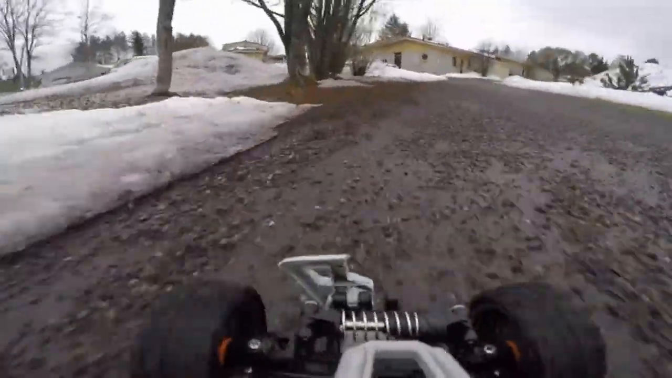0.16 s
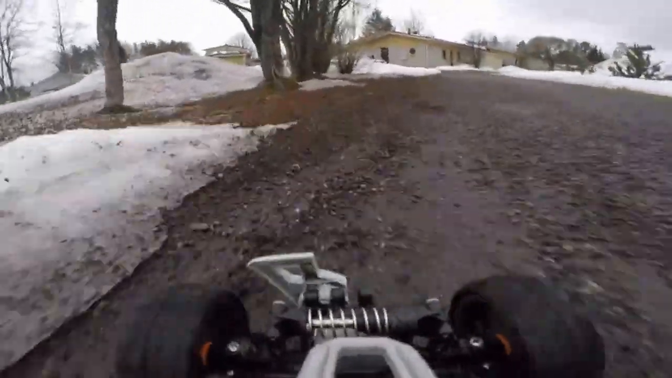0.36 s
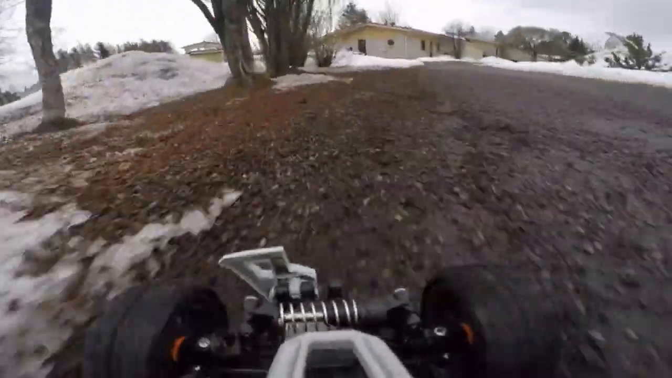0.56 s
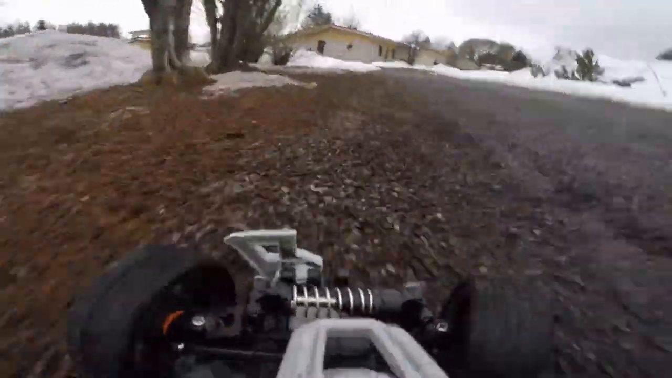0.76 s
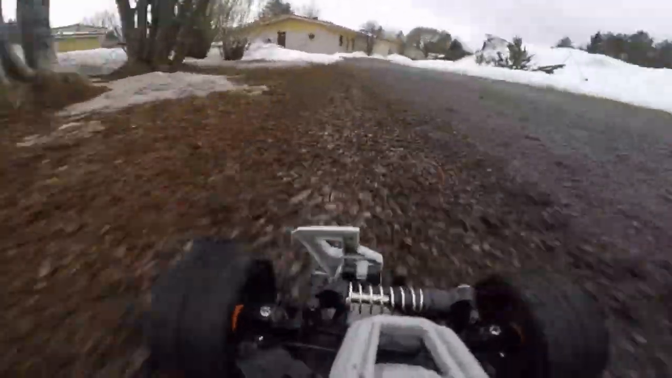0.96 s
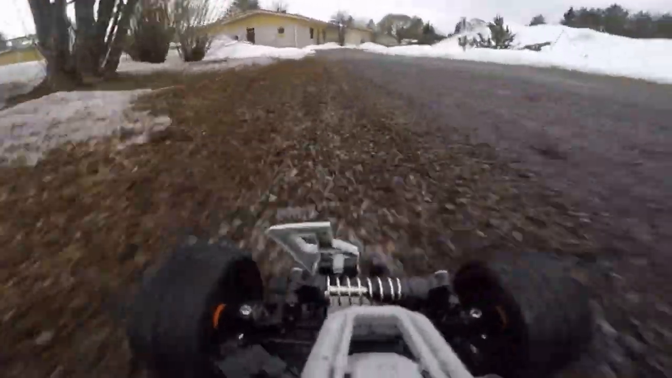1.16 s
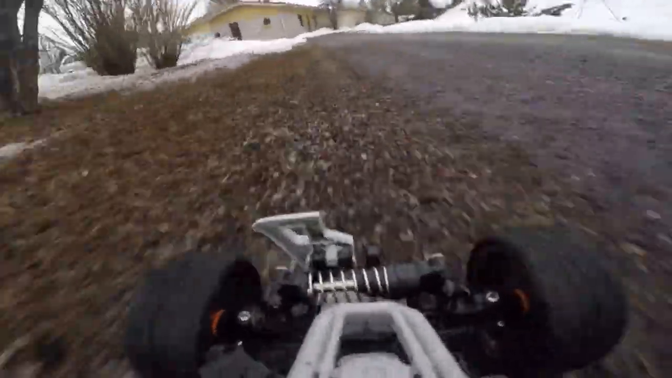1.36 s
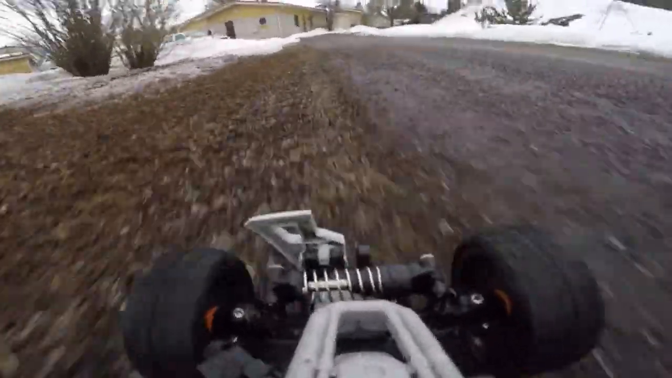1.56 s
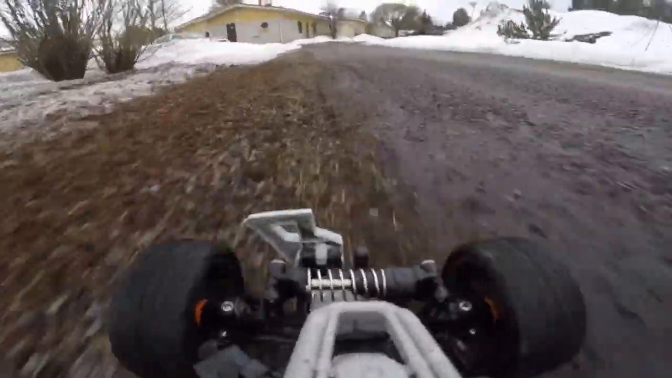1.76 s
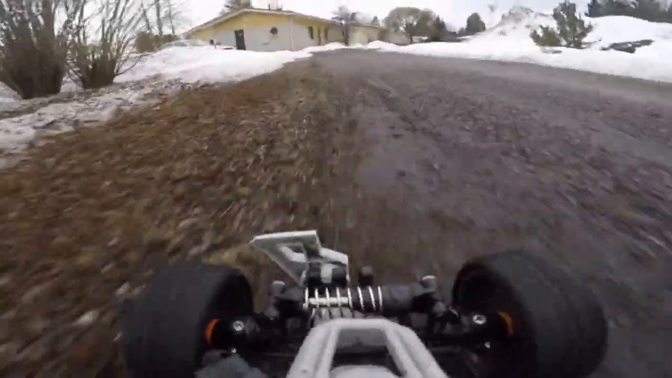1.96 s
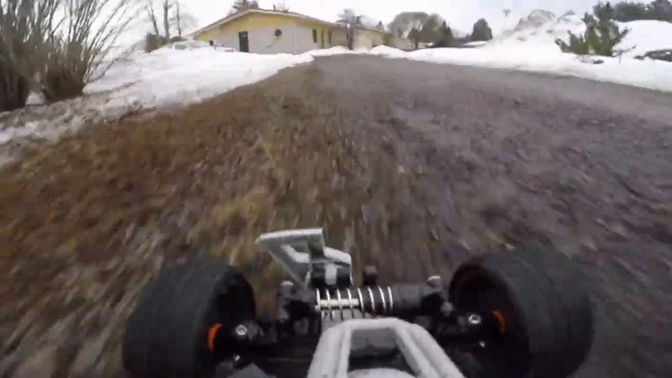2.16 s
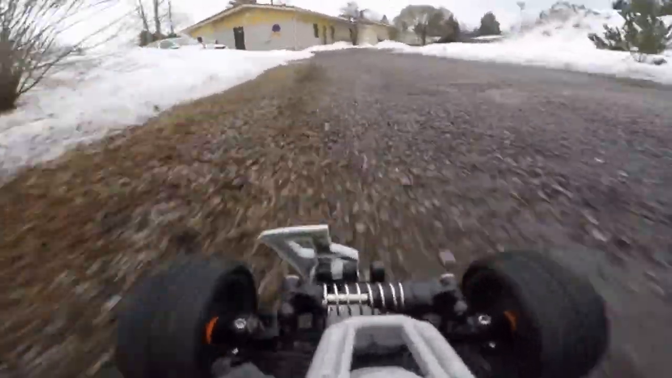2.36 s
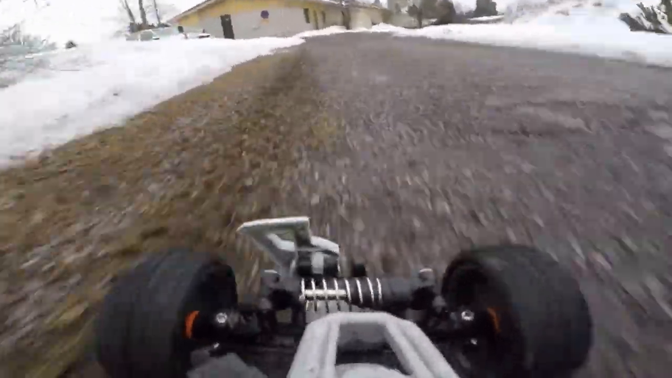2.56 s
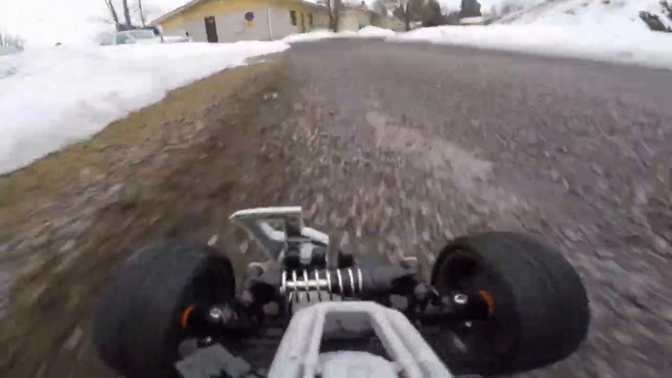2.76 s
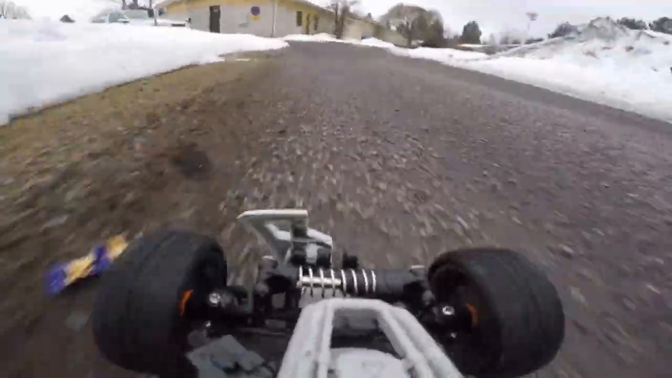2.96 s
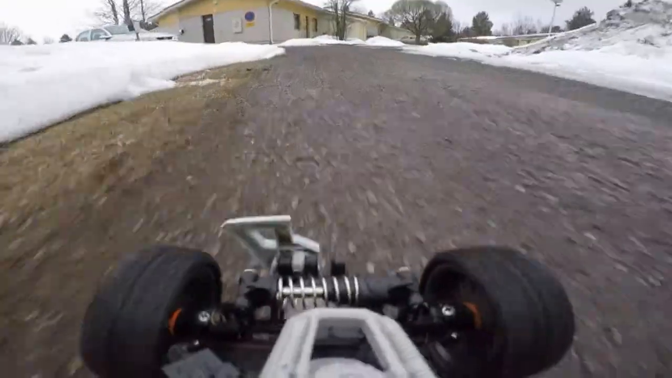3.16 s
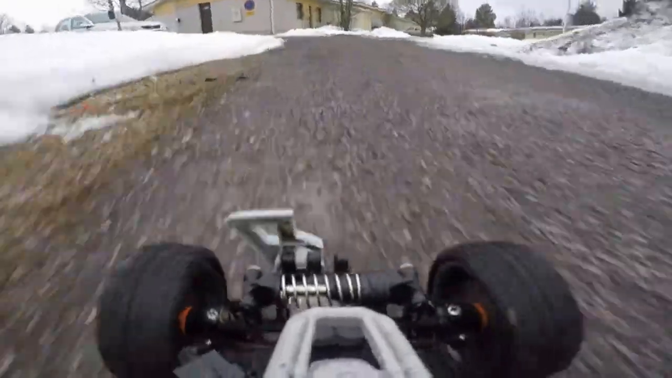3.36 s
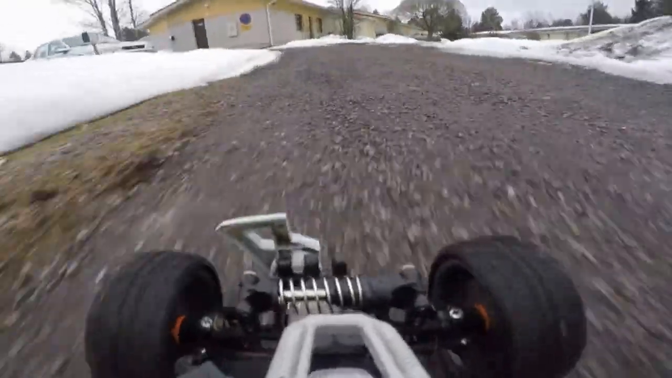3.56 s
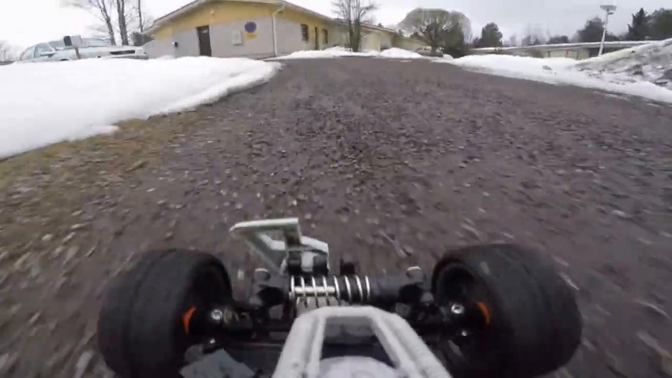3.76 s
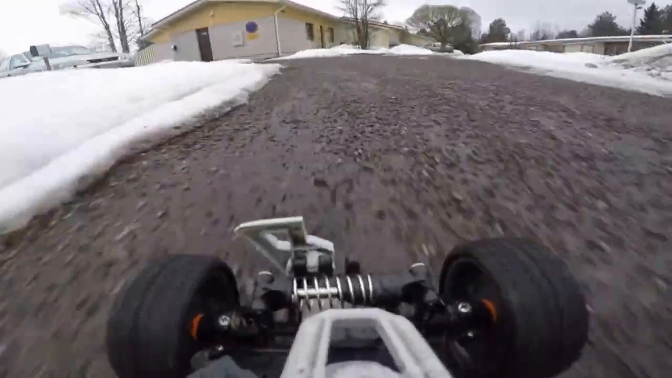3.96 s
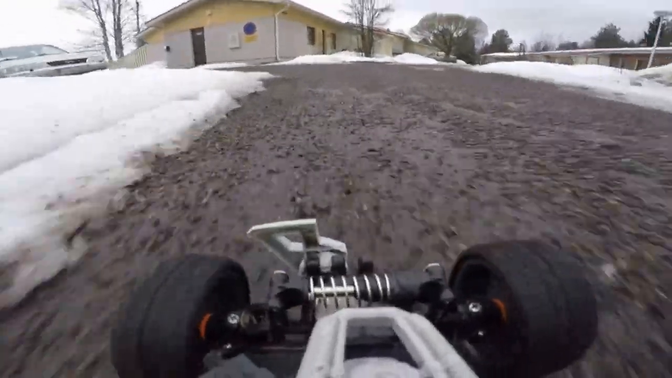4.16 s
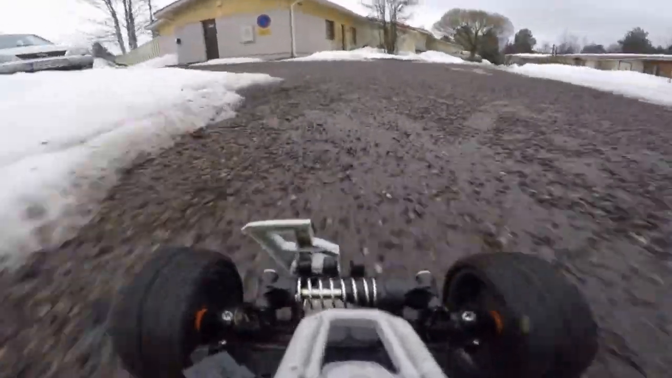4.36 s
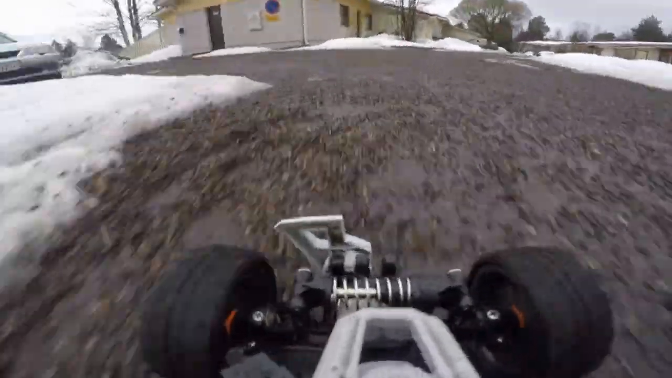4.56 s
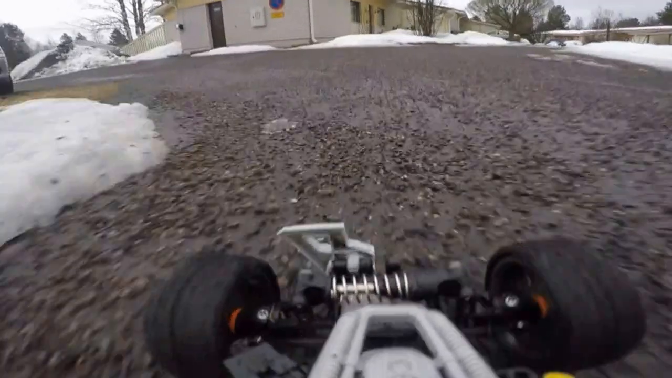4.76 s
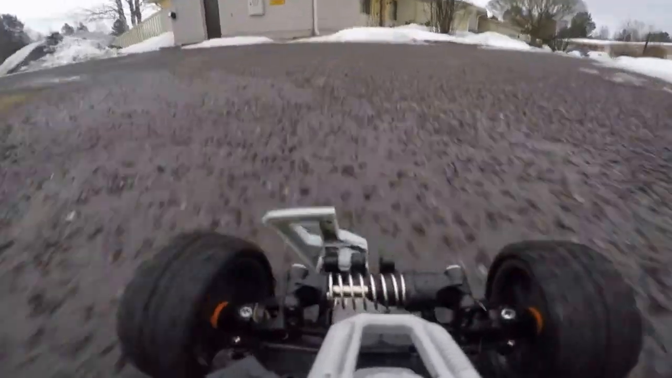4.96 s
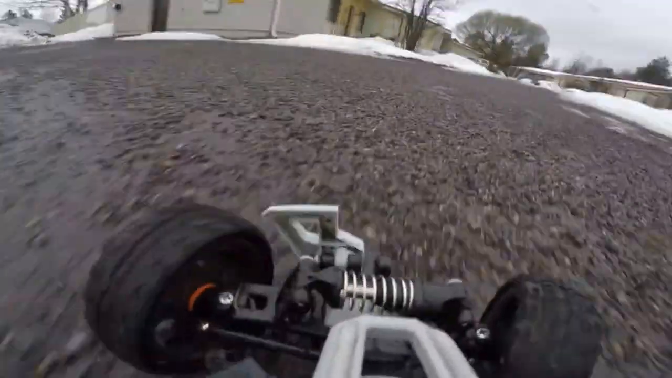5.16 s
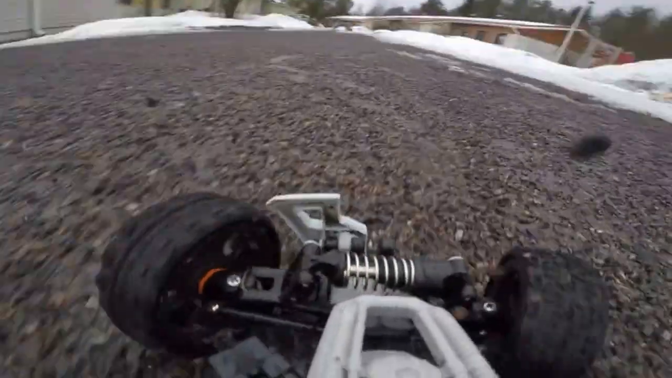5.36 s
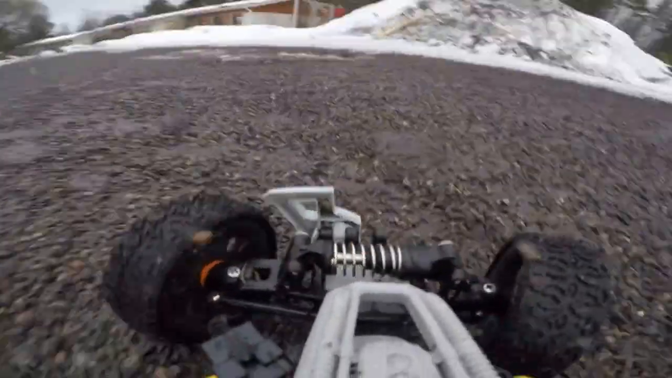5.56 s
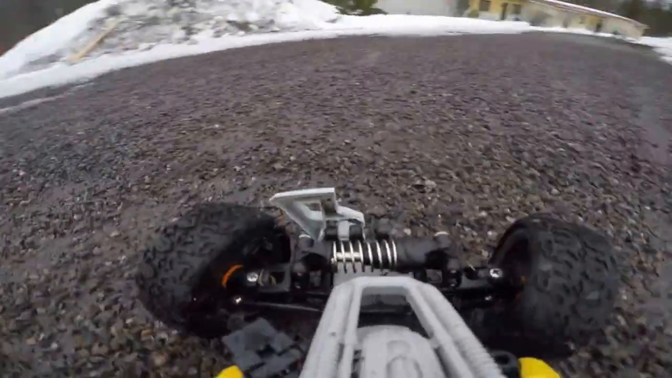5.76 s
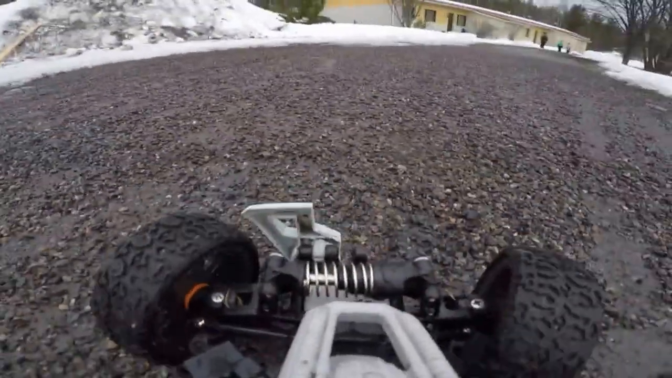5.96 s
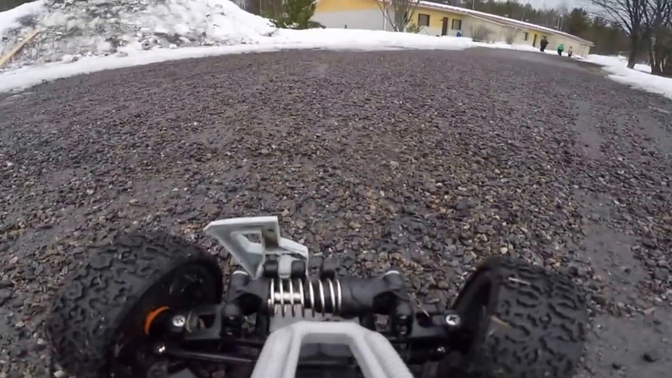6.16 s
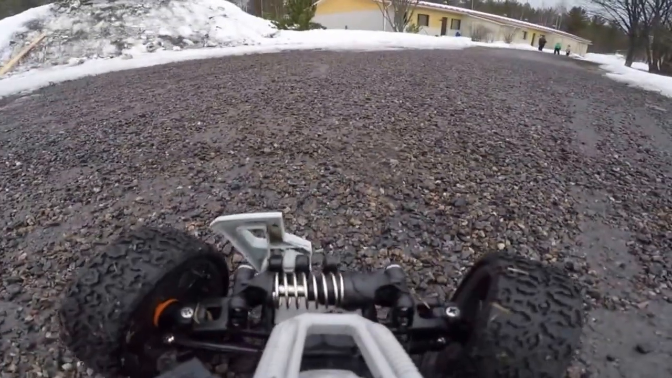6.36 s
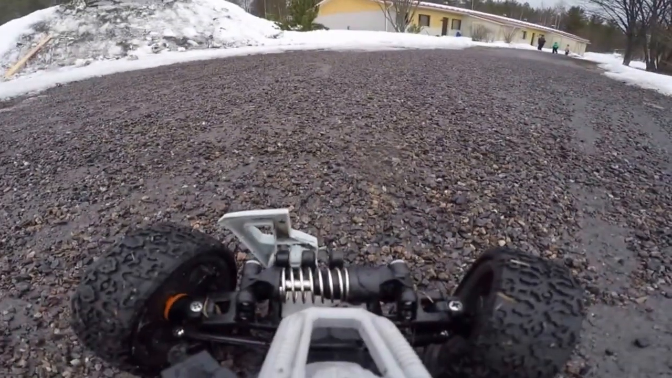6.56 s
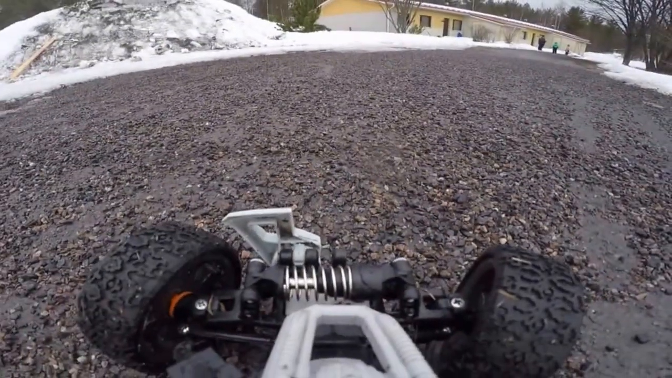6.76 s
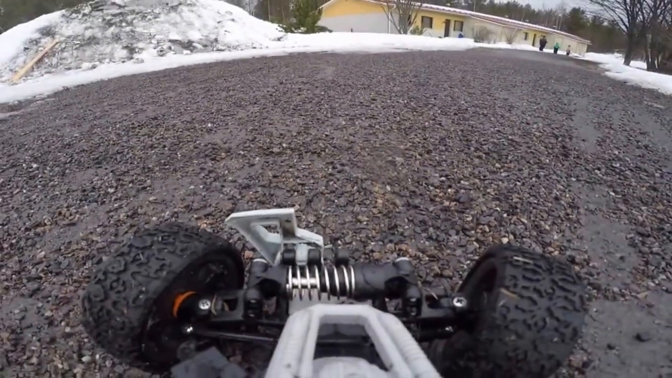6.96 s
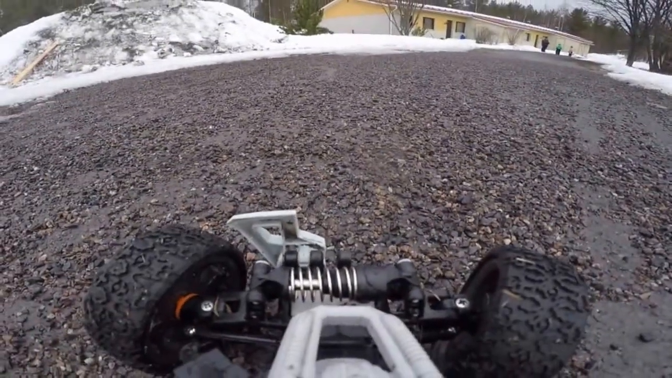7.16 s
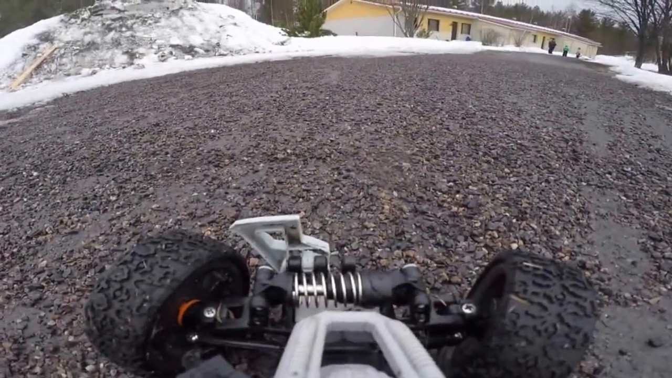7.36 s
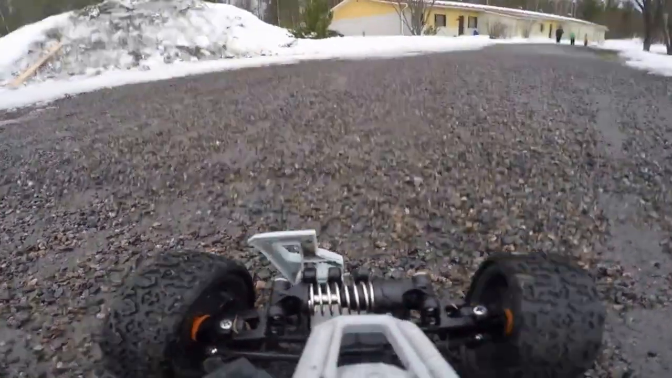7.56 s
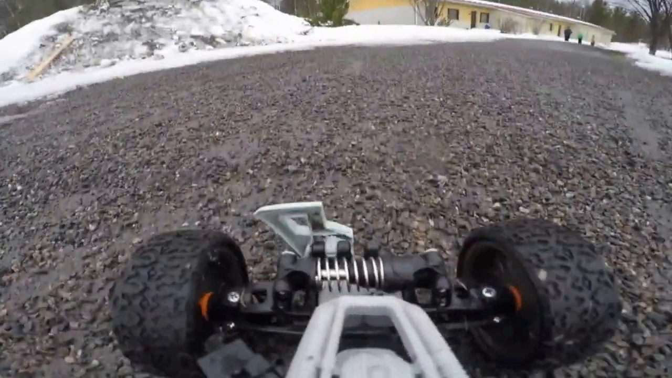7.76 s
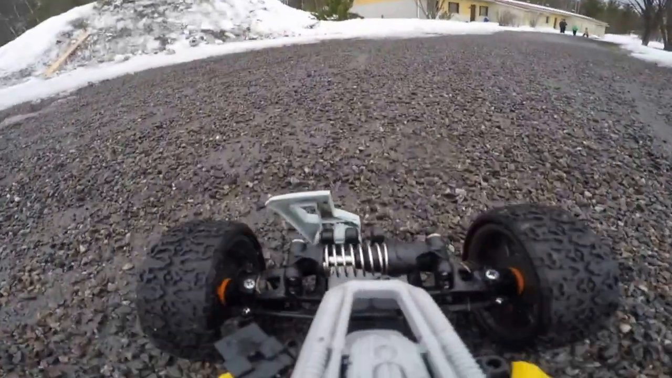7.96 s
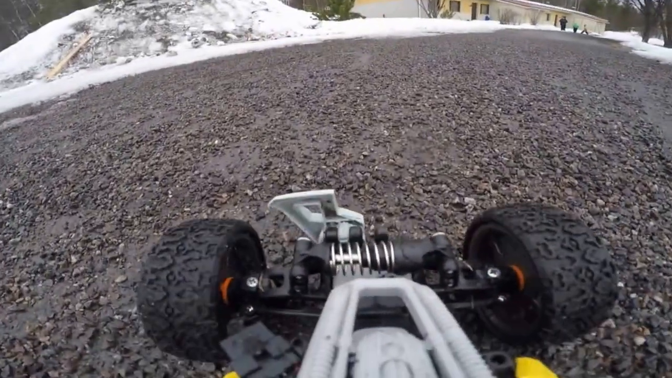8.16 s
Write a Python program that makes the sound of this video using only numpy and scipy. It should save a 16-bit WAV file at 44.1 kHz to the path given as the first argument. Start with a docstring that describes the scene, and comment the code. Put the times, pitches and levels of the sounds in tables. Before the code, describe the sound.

Close, boxy and dry, from a cased microphone mounted on a toy car: irregular plastic clatter, suspension bumps, dull gravel crunch and some rushing spray. The rattling grows denser and harder, then dies as the car stops on gravel outdoors. Faint hiss rises with a thin whine until a distorted bang starts a short lurch, a few knocks and near silence again.

```python
"""Gravelly tarmac: a radio-controlled car carries a cased camera, stops, waits and jerks forward again.
The microphone is in the case, so almost everything arrives through the chassis: damped swings for bumps,
noise bursts ringing mount and case for knocking parts, showers of tiny grains for crunching grit.
A few stones tick on the case, faint hiss and a thin whine fill the wait; the hardest jolts overload."""
import sys
import numpy as np
from scipy import signal
from scipy.fft import rfft, irfft
from scipy.io import wavfile

SR = 44100
rng = np.random.default_rng(int(sys.argv[2]) if len(sys.argv) > 2 else 0)


def file_out(sig):
    """Save sig as 16-bit WAV at sys.argv[1]."""
    # one column per channel
    cols = np.atleast_2d(sig).T
    # limit, then scale
    lim = np.clip(cols, -1, 1)
    pcm = np.round(lim * 32767).astype(np.int16)
    wavfile.write(sys.argv[1], SR, pcm)


N = 362502
TIME = np.arange(N) / SR  # s

# The distinct jolts, hard and soft, each a wheel hitting a bump and a loose part knocking.
# Each row: time in seconds, knock in dB, relative brightness in dB, pitch of the part in Hz,
# time scale of the chatter in seconds, suspension thud in dB before the common bump gain.
DISTINCT_JOLTS = [(.115, -19, 6.5, 1240, 0.0053, -8), (0.329, -29.5, 13, 910, 0.0052, -16),
                  (0.424, -16, 11, 1600, 0.0045, -27), (0.44, -20, 4, 1200, .006, -24),
                  (0.517, -18, -1, 1070, 0.011, -5), (.577, -20.5, -10, 2630, 0.0015, -14),
                  (0.65, -27, -21, 600, 0.0022, -12), (.746, -22.5, -5, 600, 0.0014, -8.5),
                  (.9, -17.5, -8.5, 3570, 0.0023, -17), (0.933, -17, 8, 580, 0.0032, -8.5),
                  (1.018, -23.5, -10, 596, 0.0035, -16.5), (1.059, -24.5, 17, 3570, 0.0016, -20),
                  (1.15, -23, -32, 580, 0.0034, -9), (1.2492, -18, 5.5, 1160, 0.0024, -10),
                  (1.379, -20, 5, 576, 0.0046, -7), (1.415, -16, -3.5, 1310, 0.00087, -18),
                  (1.468, -17, -15, 2450, 0.0027, -7.5), (1.583, -18.5, 4, 1400, 0.0033, -17),
                  (1.597, -18, -10, 1790, 0.0021, -14), (1.637, -15.5, -7, 600, 0.0019, -6),
                  (1.68, -14, 3, 1180, .002, -50), (1.725, -22, 10, 1300, 0.0029, -20),
                  (1.758, -18.5, 0, 560, 0.0066, -10), (1.821, -17.5, -5, 595, 0.008, -15),
                  (1.851, -16.5, 13, 805, 0.0029, -13.5), (1.9, -17, 6, 570, 0.0048, -12),
                  (1.967, -12.5, -5.5, 580, 0.0011, -27), (2, -20, 13, 2780, .0034, -12.5),
                  (2.084, -13.5, 2.5, 580, 0.013, -15.5), (2.098, -11.5, 2.5, 870, 0.003, -7),
                  (2.154, -16, -8, 3780, .002, -4.5), (2.173, -15.5, 6, 612, 0.0065, -14),
                  (2.184, -18.5, 22, 1076, 0.0065, -28), (2.221, -16, -6, 4100, 0.0015, -11),
                  (2.289, -16.5, -24, 720, .007, -18), (2.3196, -19, 3, 1800, 0.004, -20),
                  (2.357, -20.5, -16, 1290, 0.0023, -35), (2.375, -21.5, -9, 1880, 0.0041, -33),
                  (2.446, -19, 6, 3740, 0.0025, -30), (2.468, -19.5, 1, 4060, 0.0025, -9),
                  (2.521, -26, 6, 604, 0.0061, -14), (2.591, -19, 1, 3300, .003, -22),
                  (2.603, -17.5, 8, 1920, 0.0026, -16.5), (2.688, -14, -5.5, 1520, 0.0014, -9.5),
                  (2.699, -18, 20.5, 640, 0.0042, -19.5), (2.7612, -13, -9, 580, 0.0037, -27),
                  (2.784, -14.5, 11.5, 840, 0.0034, -2), (2.818, -15.5, -7, 3180, 0.0016, -34),
                  (2.855, -19, 2, 1673, 0.012, -13), (2.8855, -11, 8, 1050, 0.0027, -7),
                  (2.907, -25, 19, 1932, 0.0023, -18), (2.976, -17.5, -8, 1320, 0.0054, -13),
                  (3.02, -17, 6, 2970, 0.0021, -13), (3.049, -21.5, 2, 1150, 0.0012, -30),
                  (3.078, -21.5, -6, 3780, 0.009, -36), (3.096, -11, -4.5, 1420, 0.0044, -9),
                  (3.1241, -15.5, 3, 1200, 0.00097, -18), (3.174, -23, -7, 3380, 0.0039, -12),
                  (3.2454, -8, 1.5, 1160, 0.0029, -5), (3.2825, -13.5, 5.5, 820, 0.0078, -12.5),
                  (3.359, -15.5, 3.5, 1400, 0.003, -24), (3.462, -19.5, 9, 960, 0.0031, -38),
                  (3.616, -24.5, 11.5, 1160, 0.0012, -33), (3.651, -24, -32, 600, 0.0027, -12.5),
                  (3.688, -18.5, -5, 3260, 0.0035, -7), (3.75, -22.5, 5, 1520, 0.0026, -35),
                  (3.757, -16, -8, 770, 0.0095, -9), (3.781, -19, -8, 2850, 0.0097, -15),
                  (3.835, -20.5, 13.5, 840, 0.0022, -13), (3.862, -20, -14, 3780, 0.0047, -10),
                  (3.947, -15, -30, 4000, 0.0083, -10.5), (4.033, -14, -10, 900, 0.0077, -7),
                  (4.105, -22, -17, 1600, 0.017, -8), (4.171, -21.5, 11, 600, 0.0026, -10),
                  (4.212, -16, 4, 800, 0.0051, -11.5), (4.237, -16.5, 1, 780, 0.0018, -8),
                  (4.256, -32, 29, 850, 0.0028, -28), (4.277, -19, 2, 1850, 0.0041, -25),
                  (4.327, -16.5, 12, 596, 0.0025, -14), (4.372, -14, 1, 1860, 0.0021, -15),
                  (4.386, -14.5, 6.5, 1290, 0.0018, -14.5), (4.3973, -17.5, 20, 2200, 0.0013, -20),
                  (4.442, -22.5, 14.5, 2990, .004, -31), (4.451, -11, 6.5, 804, 0.0069, -7),
                  (4.503, -14.5, -23.5, 2210, 0.015, -12), (4.628, -16, -24.5, 3825, 0.006, -17),
                  (4.645, -20.5, 5, 1270, 0.0048, -38), (4.667, -13, -21, 3020, 0.0042, -20.5),
                  (4.692, -19.5, 9, 665, 0.0027, -9.5), (4.7353, -11, 10.5, 1330, 0.0024, -7),
                  (4.844, -19.5, 8, 3000, 0.015, -12), (4.8984, -13, -1.5, 800, 0.0064, -29),
                  (4.949, -11.5, -1, 594, 0.0035, -6), (4.986, -11.5, -1, 1860, 0.011, -34),
                  (5.053, -15, -7, 2470, 0.0024, -29), (5.082, -15, -12, 2300, 0.0027, -43),
                  (5.102, -13.5, 0.5, 885, 0.0027, -16), (5.119, -18, 17.5, 600, 0.0037, -31.5),
                  (5.198, -15.5, 15, 606, 0.00095, -11.5), (5.276, -25.5, 24, 2700, 0.0033, -23.5),
                  (5.334, -26, 17, 680, 0.003, -28.5), (5.368, -43, 3, 2200, .003, -12),
                  (5.387, -18.5, 14, 1355, .007, -18), (5.613, -24.5, 1, 1450, 0.0065, -14.5),
                  (5.697, -22, 3, 646, 0.012, -9.5), (5.808, -20.5, 2, 1660, 0.012, -14.5),
                  (5.829, -12, 2.5, 960, 0.0013, -19), (5.928, -33.5, 23, 1400, 0.0023, -19),
                  (5.949, -12.5, 9.5, 1390, 0.0041, -20), (5.977, -22, 7, 750, 0.0033, -34),
                  (6.085, -56, -5, 905, .004, -27), (6.21, -71, 6, 1075, 0.0035, -30),
                  (6.469, -52, -4, 1350, .003, -45.5), (6.57, -57, -8, 3970, .007, -47),
                  (6.702, -66, 5, 1575, 0.0044, -60), (7.561, -28, -25, 670, 0.0042, -18.5),
                  (7.5757, -2.5, 0.5, 625, 0.0027, 0.5), (7.59, -30, 11, 1870, 0.0016, -21),
                  (7.66, -21, -37, 1080, 0.0024, -11.5), (7.727, -15.5, 2.5, 620, 0.0035, -19),
                  (7.803, -18, -8, 1470, 0.0015, -42), (7.864, -34.5, -6, 1700, .012, -49),
                  (7.962, -18.5, 11.5, 1530, 0.0039, -61), (8.047, -52, 0, 760, .004, -44),
                  (8.188, -54, 0, 1330, 0.0028, -37)]
# a loose part shivers in its slack this long before it knocks
SHIVER_LEAD_S = .003


def amp(db):
    """Decibels to gain."""
    return 10 ** (np.asarray(db) / 20)


def unit(x):
    """Scales to rms 1."""
    return x / np.sqrt(np.mean(x ** 2) + 1e-20)


def read_spectrum(points, hz):
    """A spectrum in dB, joined on a log-frequency axis."""
    f, db = np.transpose(points)
    return np.interp(np.log(hz + 1), np.log(f + 1), db)


def follow(rows, column, at=TIME):
    """One dB column of a curve as a gain, at every sample or at given times."""
    rows = np.array(rows)
    return amp(np.interp(at, rows[:, 0], rows[:, column]))


def add(mix, s, sound):
    """Adds a sound to the mix at time s."""
    part = mix[max(0, round(s * SR)):][:len(sound)]
    part += sound[:len(part)]


def noise(points):
    """Noise of rms 1 with the given spectrum."""
    white = rfft(rng.standard_normal(N))
    return unit(irfft(white * amp(read_spectrum(points, np.fft.rfftfreq(N, 1 / SR))), N))


def wander(rate_hz):
    """A smooth random curve of rms 1: low-passed noise."""
    lowpass = signal.butter(2, rate_hz, fs=SR, output="sos")
    return unit(signal.sosfilt(lowpass, rng.standard_normal(N)))


def resonate(x, hz, width_hz):
    """A two-pole resonance."""
    return signal.lfilter(*signal.iirpeak(hz, hz / width_hz, fs=SR), x)


def resonate_twice(x, hz, width_hz):
    """The same resonance twice in a row, for steeper sides."""
    return resonate(resonate(x, hz, width_hz), hz, width_hz)


def scattered(count):
    """Random times in seconds, one in each equal slice of the ride."""
    return (np.arange(count) + rng.random(count)) / count * N / SR


def case_ring(bright_db, part_hz=1000, part_db=0, part_octaves=.38, corner_hz=2500, size=2048):
    """Ring of mount and case after a contact: harder ones lift the treble, the struck part adds its pitch."""
    # Overall slope of the path from chassis to microphone. Each row: frequency in Hz, level in dB.
    slope = [(60, -22.5), (250, -3.5), (450, -4), (700, -3), (1050, -1.5), (1750, 1.5), (2300, -0.5),
             (3050, -10), (3800, -9.5), (4300, -21.5), (5800, -24.5), (6200, -34), (9000, -39),
             (15000, -57.5)]
    # Resonances of mount and case. Each row: frequency in Hz, width in Hz, lift in dB.
    modes = [(587, 210, 6.9), (839, 140, 7), (1226, 280, 6.2), (1397, 120, 5), (2156, 200, 6.94),
             (2490, 72, 5.1), (2830, 180, 7), (3467, 600, 6.3), (3640, 71, 4), (4230, 91, 5.4),
             (4650, 150, 8), (5250, 130, 3.7), (5790, 410, 7.2), (9900, 360, 6), (11000, 250, 8)]
    hz = abs(np.fft.fftfreq(size, 1 / SR))
    db = read_spectrum(slope, hz)
    db = db + sum(lift / (1 + (2 * (hz - f) / width) ** 2) for f, width, lift in modes)
    db = db + bright_db * (1 - 1 / (1 + (hz / corner_hz) ** 4))
    db = db + part_db * np.exp(-(np.log2((hz + 1) / part_hz) / part_octaves) ** 2)
    # minimum phase: the ring starts at the contact, never before it
    log_response = np.conj(signal.hilbert(np.log(amp(db))))
    return np.fft.ifft(np.exp(log_response)).real[:size // 2]


def road(column, at=TIME):
    """The level of grit (1), shake (2) or drone (3) over the whole ride."""
    # The drive, braking to a halt. Each row: time in seconds, then grit, chassis shake and tyre drone
    # in dB, before the gains of each layer.
    drive = [(0, -32, -14, -35.5), (.7, -32, -14.5, -34.5), (1.7, -26.5, -18, -29), (2.3, -30, -19, -33),
             (2.8, -25, -10.5, -24.5), (3.0, -33, -20, -33.5), (3.8, -32.5, -15, -33),
             (3.93, -37.5, -20, -27), (4.3, -27.5, -25, -25), (4.6, -30, -16.5, -29),
             (5.0, -26, -12.5, -21), (5.48, -30, -23, -26.5), (5.72, -26, -17.5, -17.5),
             (5.9, -34.5, -22.5, -35), (6.0, -37, -17, -29), (6.08, -52, -26, -47),
             (6.36, -70.5, -33, -59.5), (6.56, -66, -36.5, -59.5), (6.65, -80, -45.5, -78),
             (6.9, -82, -61, -91), (7.55, -81, -62, -72)]
    # The short lurch forward and the coasting after it. Each row: the same columns.
    lurch = [(7.565, -35, 0.5, -47), (7.63, -29.5, -19, -40), (7.781, -31, -21, -24), (7.85, -45, -36, -46),
             (7.91, -46.5, -27, -40), (7.955, -37.5, -35, -44), (8.0, -54.5, -27.5, -49.5),
             (8.22, -56.5, -29.5, -43.5)]
    return follow(drive + lurch, column, at)


def uneven(depth_db, patches_hz):
    """The road surface changes from patch to patch: a random gain."""
    return amp(depth_db * np.tanh(wander(patches_hz)))


def contact(dip_db=5, press_db=2.0, per_knock=.08, hard_db=-16, before_s=.031, flight_s=.0087, after_s=.025):
    """Gain for the road noises: wheels go light before a jolt and press down after it, more on harder ones."""
    lift, press = np.zeros((2, N))
    for s, db, *_ in DISTINCT_JOLTS:
        near = slice(max(0, round((s - .2) * SR)), round((s + .2) * SR))
        t = TIME[near] - s
        force = 0.5 + per_knock * (db - hard_db)
        lift_now = force * np.exp(-((t + before_s) / flight_s) ** 2 / 2)
        press_now = force * np.exp(-((t - after_s) / after_s) ** 2)
        lift[near] = np.maximum(lift[near], lift_now)
        press[near] = np.maximum(press[near], press_now)
    return amp(press_db * press - dip_db * lift)


def air(whine_db=-17, whine_hz=6600):
    """Hiss of the moving car, a faint background hiss, and a thin electronic whine; shaped noise and a sine."""
    # Air and spray rushing past, rising with speed. Each row: time in seconds, level in dB.
    rush = [(0, -58), (.7, -53.5), (1.1, -51), (1.8, -49), (2.4, -51), (3.4, -56.5), (3.9, -53.5),
            (4.8, -52.5), (5.05, -62), (5.25, -56.5), (5.75, -53), (5.9, -64), (6.22, -73.5), (6.3, -91),
            (6.6, -100), (7.57, -100), (7.63, -58), (7.75, -61), (7.9, -90), (8.22, -82)]
    # Colour of that rush. Each row: frequency in Hz, relative dB per Hz.
    spray_spectrum = [(500, -42.5), (3000, 4), (5500, 7), (7200, -5.5), (9000, 1), (10400, -5), (12300, -6),
                      (13200, -14), (14300, -6.5), (16000, -13.5)]
    # Faint background hiss, turned up while the car stands. Each row: time in seconds, level in dB.
    hiss_level = [(0, -84.5), (6.6, -73), (6.9, -67), (7.2, -62.5), (7.55, -62), (7.7, -73.5), (8.22, -93)]
    # Colour of the background hiss. Each row: frequency in Hz, relative dB per Hz.
    hiss_spectrum = [(20, 14.5), (100, 20.5), (200, 10), (400, 5), (700, 3.5), (1400, 1), (1900, 0),
                     (3800, 1), (5000, -3), (9000, -8.5), (15000, -14.5)]
    whine = amp(whine_db) * np.sin(2 * np.pi * whine_hz * TIME)  # level against the hiss
    background = noise(hiss_spectrum) + whine
    return follow(rush, column=1) * noise(spray_spectrum) + follow(hiss_level, column=1) * background


def grit(ring, grains_per_s, grain_db=3, clump_db=4.0, clump_hz=50):
    """Clumps of small grains under the treads, each ringing the case."""
    sizes = rng.choice([-1, 1], N) * amp(grain_db * np.minimum(rng.exponential(1, N), 4))
    falls = rng.random(N) < grains_per_s / SR
    grains = falls * sizes * amp(clump_db * wander(clump_hz))
    return unit(signal.oaconvolve(grains, ring)[:N])


def shake(sway_hz=65, full_shake_db=-17, buzz_growth=0.39):
    """The chassis sways slowly at any speed; its faster shudder grows with the shaking."""
    # Colour of the shaking. Each row: frequency in Hz, relative dB per Hz.
    shake_spectrum = [(8, -19), (20, -2.5), (32, 5.5), (60, -14), (100, -7), (150, -15.5), (300, -38.5),
                      (600, -77.5)]
    level, motion = road(column=2), noise(shake_spectrum)
    lowpass = signal.butter(3, sway_hz, fs=SR, output="sos")
    sway = signal.sosfiltfilt(lowpass, motion)
    shudder_gain = np.minimum(level / amp(full_shake_db), 1) ** buzz_growth
    return level * (sway + shudder_gain * (motion - sway))


def tyre_drone(tyre_hz=194, tyre_width_hz=56):
    """The rolling tyres drone: noise through a narrow resonance."""
    return road(column=3) * unit(resonate_twice(rng.standard_normal(N), tyre_hz, tyre_width_hz))


def rolling(crunch_db=-9, shake_db=-3.0):
    """Dull grit at any speed, a brighter crackle when driven hard; the chassis shakes and the tyres drone."""
    load = road(column=1) * uneven(depth_db=2.5, patches_hz=6.3)
    dull_ring = case_ring(bright_db=-16.5, corner_hz=2440)
    dull = grit(dull_ring, grains_per_s=5000, grain_db=2.0)
    crisp_ring = case_ring(bright_db=1.5, part_hz=3400, part_db=3.0)
    crunch = unit(load) * grit(crisp_ring, grains_per_s=600, grain_db=3.5)
    body = amp(shake_db) * shake() + tyre_drone()
    return load * (dull + amp(crunch_db) * crunch) + uneven(depth_db=6.0, patches_hz=36) * body


def swell(peak_s, count=5000):
    """A soft push that peaks at peak_s and dies away."""
    u = np.arange(count) / SR / peak_s
    return u ** 2 * np.exp(2 - 2 * u)


def swing(hz, peak_s, scatter):
    """A heavily damped swing, its pitch and phase drawn afresh each time."""
    push = swell(peak_s)
    swing_hz = hz * np.exp(scatter * (2 * rng.random() - 1))
    turns = swing_hz * np.arange(len(push)) / SR
    return push * np.sin(2 * np.pi * (turns + rng.random()))


def bump(thud_db, boom_db, thud_s=.0093, boom_s=.01, shudder_db=-12, shudder_hz=230, shudder_width_hz=170):
    """A bump swings the damped suspension and booms in the hollow tyre."""
    push = swell(boom_s)
    shudder = resonate_twice(rng.standard_normal(len(push)), shudder_hz, shudder_width_hz)
    boom = swing(152, boom_s, scatter=.25) + amp(shudder_db) * push * unit(shudder)
    thud = swing(58, thud_s, scatter=.26)
    return amp(thud_db) * thud + amp(boom_db) * boom


def small_bumps(thud_db=-13, boom_db=-20, full_shake_db=-16, growth=2.1, spread_db=4, count=60):
    """Lesser bumps come at random while the chassis shakes, and fade out as the shaking fades."""
    out = np.zeros(N)
    for s, strength in zip(scattered(count), 2 * rng.random(count) - 1):
        shaken = road(column=2, at=s) / amp(full_shake_db)
        gain = min(shaken, shaken ** growth) * amp(spread_db * strength)
        add(out, s, gain * bump(thud_db, boom_db))
    return out


def knock(bright_db, hz, length, hard_db=1, rise_share=0.56, spiky_db=4.0,
          rattle_db=-10, rattle_s=.0062, rattle_bright_db=-5, span_s=0.0093, count=2400):
    """A duller rattle starts, then a quick swell of contacts rings one part and the case."""
    t = np.arange(count) / SR
    struck = np.maximum(t - SHIVER_LEAD_S, 0)
    push, shiver, size = rng.standard_normal((3, count))
    rise = 1 - np.exp(-(struck / (rise_share * length)) ** 2)
    force = rise * np.exp(-(struck / length) ** 2 / 2)
    contacts = push * amp(spiky_db * size) * force
    blow = signal.fftconvolve(contacts, case_ring(bright_db + hard_db, hz, part_db=9.0))
    rattle = signal.fftconvolve(shiver * t * np.exp(-t / rattle_s), case_ring(rattle_bright_db))
    # the blow's energy equals that of rms 1 held for span_s
    return np.sqrt(span_s * SR / len(blow)) * (unit(blow) + amp(rattle_db) * unit(rattle))


def rattles(rattle_db=-28.5, full_grit_db=-30, growth=1.6, spread_db=4.0, bright_db=1, bright_spread_db=10,
            low_hz=600, high_hz=3400, chatter_s=.0032, count=190):
    """All through the ride loose parts knock lightly at random; they settle quickly as the grit dies down."""
    out = np.zeros(N)
    for s, (strength, hardness, part) in zip(scattered(count), 2 * rng.random((count, 3)) - 1):
        hz = low_hz * (high_hz / low_hz) ** ((part + 1) / 2)
        shaken = road(column=1, at=s) / amp(full_grit_db)
        gain = min(np.sqrt(shaken), shaken ** growth) * amp(rattle_db + spread_db * strength)
        add(out, s, gain * knock(bright_db + bright_spread_db * hardness, hz, chatter_s))
    return out


def stones(decay_s=.00065, width_hz=2100, click_db=4, click_hz=2800, click_width_hz=3000, count=900):
    """A stone on the case gives a very short click and a bright ping: one noise burst, two resonances."""
    # Stones flung against the camera case. Each row: time in seconds, level in dB, pitch in Hz.
    hits = [(5.1978, -37, 3850), (5.2769, -16.5, 8300), (5.361, -32.5, 11900), (5.603, -32, 13100)]
    out, t = np.zeros(N), np.arange(count) / SR
    for s, db, hz in hits:
        crack = rng.standard_normal(count) * t / decay_s * np.exp(-t / decay_s)
        click = resonate_twice(crack, click_hz, click_width_hz)
        ping = resonate(crack, hz, width_hz)
        add(out, s, amp(db) * unit(unit(ping) + amp(click_db) * unit(click)))
    return out


def tick(decay_s=.0003, low_hz=6000, count=400):
    """A thin, instant click on the hardest jolts: a high-passed burst."""
    t = np.arange(count) / SR
    crack = rng.standard_normal(count) * np.exp(-t / decay_s)
    return unit(signal.sosfilt(signal.butter(2, low_hz, "high", fs=SR, output="sos"), crack))


def jolts(bump_db=3.0, boom_over_knock_db=-1.5, boom_thud_share=.12, thud_lead_s=.004, crush_db=-13,
          crush_s=.011, tick_db=-48, hard_db=-10, tick_growth=3.5, tick_bright_share=.5):
    """Each jolt thuds, booms, knocks a loose part, crushes gravel and clicks; softer ones click far less."""
    out, pressure = np.zeros((2, N))
    for s, db, bright_db, hz, length, thud_db in DISTINCT_JOLTS:
        # the tyre booms mostly in step with the knock
        boom_db = db + boom_over_knock_db + boom_thud_share * (thud_db - db)
        click_db = tick_db + tick_growth * min(db - hard_db, 0) + tick_bright_share * bright_db
        add(out, s - SHIVER_LEAD_S, amp(db) * knock(bright_db, hz, length))
        add(out, s + length, amp(click_db) * tick())
        # the suspension starts to move just before the part knocks
        add(out, s - thud_lead_s, amp(bump_db) * bump(thud_db, boom_db))
        add(pressure, s - thud_lead_s, amp(db + crush_db) * swell(crush_s))
    gravel_ring = case_ring(bright_db=-6.5, part_hz=810, part_db=2)
    return out + pressure * grit(gravel_ring, grains_per_s=990)


def scene():
    """Everything at the one microphone."""
    road_noises = contact() * (rolling() + small_bumps() + rattles())
    return (air() + road_noises + stones() + jolts())[None]


def record(dry, ceiling=1.0, edge_hz=15450):
    """The microphone overloads with a rounded knee; then the band limit."""
    clipped = dry / (1 + (dry / ceiling) ** 6) ** (1 / 6)
    lowpass = signal.firwin(501, edge_hz, window=("kaiser", 9), fs=SR)
    return signal.oaconvolve(clipped, lowpass[None], "same")


dry = scene()
out = record(dry)
file_out(out)
```